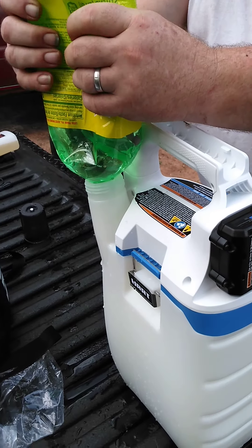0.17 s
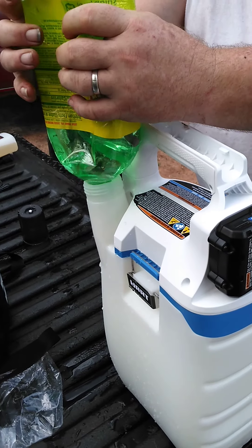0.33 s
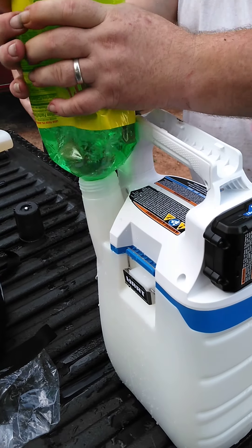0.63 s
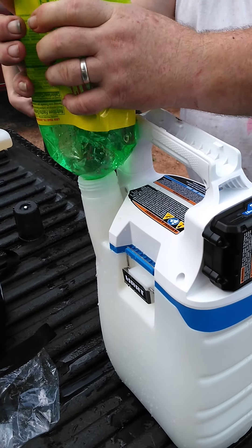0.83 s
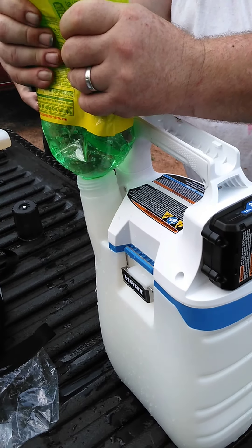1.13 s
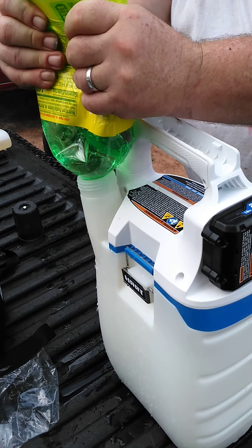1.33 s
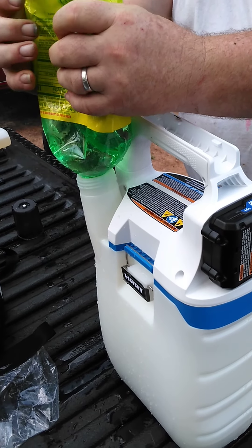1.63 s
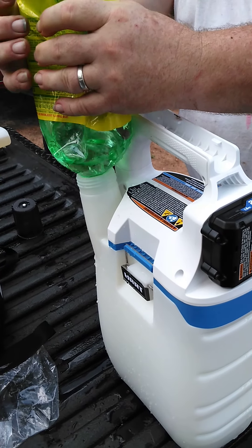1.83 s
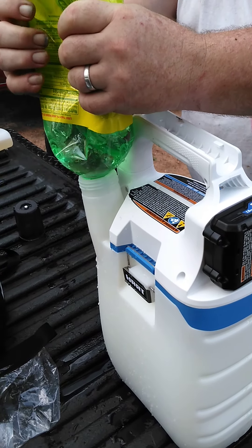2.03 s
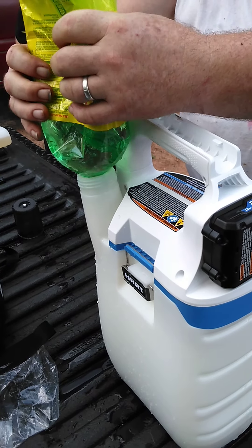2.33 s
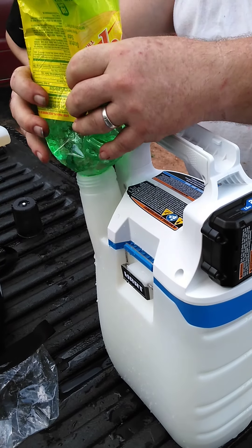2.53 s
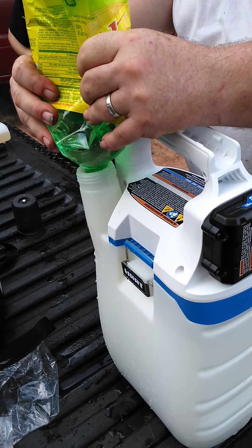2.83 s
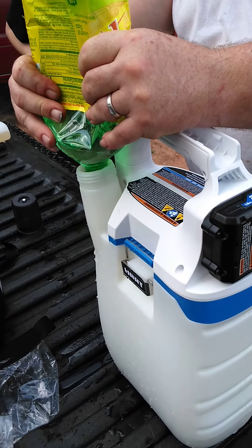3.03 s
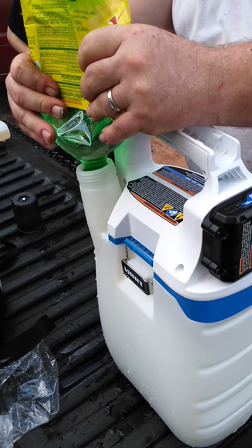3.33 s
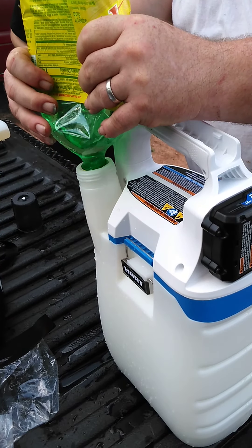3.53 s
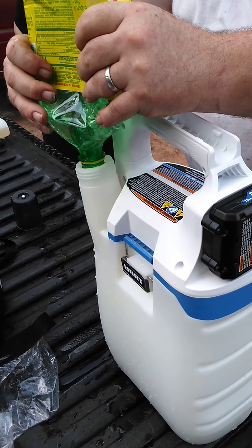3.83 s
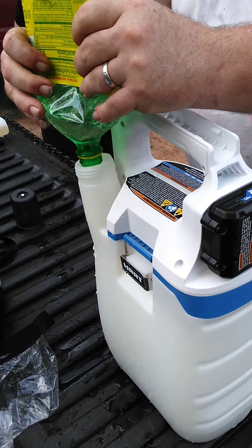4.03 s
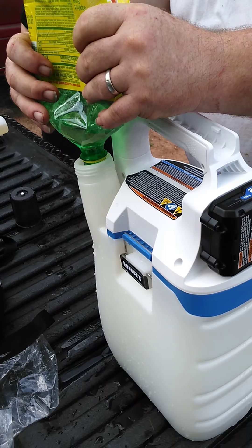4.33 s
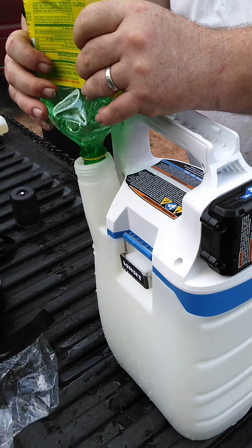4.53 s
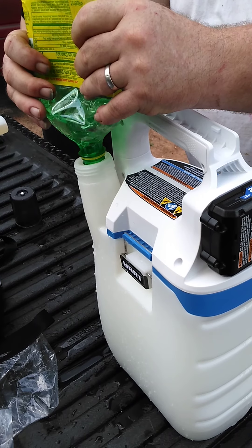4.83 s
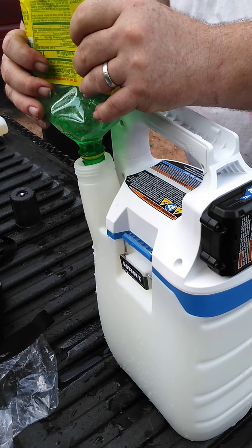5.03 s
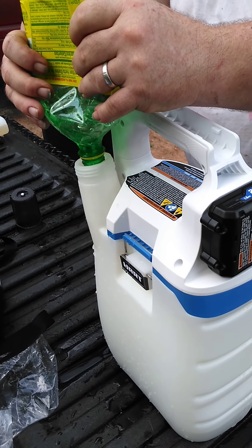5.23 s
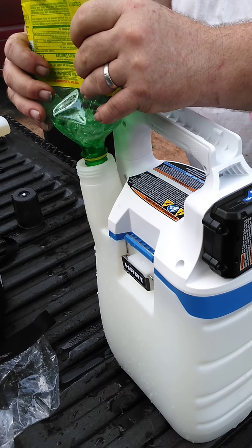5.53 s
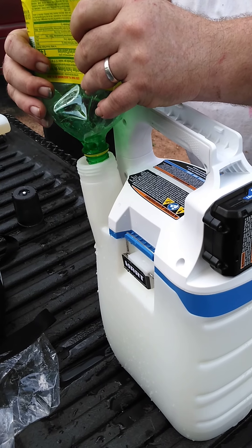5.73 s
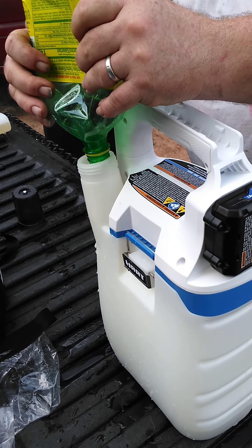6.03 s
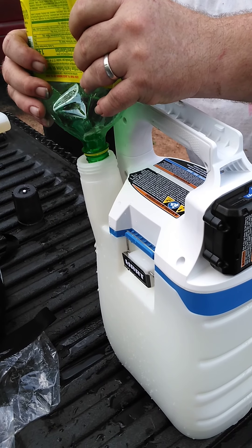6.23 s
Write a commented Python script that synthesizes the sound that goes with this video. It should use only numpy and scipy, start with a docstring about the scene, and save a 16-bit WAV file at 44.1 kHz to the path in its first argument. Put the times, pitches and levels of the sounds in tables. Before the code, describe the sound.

Quiet plops, then sharp buckling plastic cracks and gurgling gushes into a plastic tank, one loud late pop, and sparse watery blips and spatters.

```python
"""Heard first: small plops and splashes; then sharp snaps of thin plastic, gushes of water and a hollow boom;
one more loud snap halfway, then small glugs, plops and splashes. Outdoors on a truck bed, an upturned bottle is
squeezed into the neck of a plastic sprayer tank, later lifted a little. Water is tiny rising bubble tones, ringing
grains and dying sines; plastic is noise bursts and ringing wall modes; hands are micro-slips and narrow-band squeaks.
Two microphones hear the pour a little to the right, with short reflections, a breeze and faint air noise."""
import sys
import numpy as np
from scipy import signal
from scipy.fft import rfft, irfft
from scipy.io import wavfile

SR = 44100
rng = np.random.default_rng(int(sys.argv[2]) if len(sys.argv) > 2 else 0)


def waveform_to_disk(signal):
    """Save audio, clipped to [-1, 1], as 16-bit WAV at the path in sys.argv[1]."""
    frames = np.transpose(np.atleast_2d(signal))
    scaled = np.clip(frames, -1, 1) * 32767
    samples = np.round(scaled).astype(np.int16)
    wavfile.write(sys.argv[1], SR, samples)


N = 281358
TIME = np.arange(N) / SR

# gushes fall into the tank: t/s, length/s, churn level/dB, gurgle over churn/dB
GUSHES = [(0.0, 0.08, -65, -5), (0.034, 0.1, -57, -1), (0.436, 0.088, -54.5, -6), (0.581, 0.034, -54, -36),
          (0.67, 0.043, -38, -0.5), (0.972, 0.088, -35.5, -6), (1.109, 0.041, -49, 9.5),
          (1.233, 0.1, -59.5, 11.5), (1.273, 0.11, -44, -2.5), (1.412, 0.027, -36.5, -2),
          (1.513, 0.019, -34.5, -3), (1.617, 0.048, -44.5, 2), (2.075, 0.014, -57.5, -1.5),
          (2.22, 0.015, -61.5, 8.5), (2.33, 0.071, -63, -13), (2.58, 0.043, -58, -12),
          (2.611, 0.14, -69.5, 9.5), (2.77, 0.14, -60, 1), (2.93, 0.26, -65.5, -3), (3.108, 0.013, -49, 3),
          (3.279, 0.034, -63, 5), (3.579, 0.011, -59.5, 1.5), (3.847, 0.037, -63, 2),
          (4.052, 0.12, -63.5, -0.5), (4.365, 0.016, -60, -1), (4.496, 0.042, -63, -2),
          (4.807, 0.092, -63, 0.5), (5.171, 0.044, -50.5, -10.5), (5.39, 0.022, -54, -9.5),
          (5.54, 0.15, -54.5, -9), (5.867, 0.058, -61, 1), (6.1, 0.036, -68, 4), (6.241, 0.086, -56, -16)]
# a gush sets in fast, holds and drains away; between gushes a thin stream keeps running
GUSH_ATTACK_S, CHURN_FALL_DB_PER_S, GURGLE_FALL_DB_PER_S = 0.01, 199.5, 257
THIN_CHURN_DB, THIN_GURGLE_DB = -73.5, -77.5
# spectral outlines of the falling water: f/Hz, level/dB
CHURN_COLOUR = [(50, -38), (110, -16), (200, 5.5), (420, -8), (620, -9), (1200, -10)]
GURGLE_COLOUR = [(300, -24.5), (550, -7.5), (820, 4), (1100, -1.5), (1800, -8), (4000, -49)]

# the bottle wall buckles: t/s, level/dB, brightest f/Hz, length/s, build-up/s
SNAPS = [(0.6809,-23,2000,0.0053,0.00031), (0.683,-26.5,1150,0.024,0.0012),
         (0.697,-20.5,4080,0.0019,0.00072), (0.9795,-27,1380,0.0078,0.00059),
         (1.0137,-10.5,3900,0.0028,0.00037), (1.018,-16,1280,0.008,0.0022), (1.039,-10,5440,0.004,0.0021),
         (1.053,-25,1230,0.0078,0.00051), (1.194,-28,1540,0.0031,0.00084),
         (1.3497,-14.5,2270,0.0035,0.00029), (1.426,-24,740,0.0018,.002), (1.4317,-11.5,1200,0.007,0.0043),
         (1.5115,-13,3100,0.0038,0.00026), (1.55,-29,1100,0.0045,0.0003), (1.633,-20.5,1090,0.0072,0.0012),
         (3.1007,-7,3970,0.0018,0.00023), (3.11,-31,1084,0.01,0.0024), (3.524,-33,2500,0.00093,0.00084)]
# spectral outline of a snap: f/Hz, level/dB
SNAP_COLOUR = [(100, -14.5), (300, -29), (480, 5.5), (1100, 5.5), (2200, 1.5), (3300, 0.5), (4900, 1.5),
               (6200, -14.5), (8500, -22), (12000, -47.5), (16000, -46.5)]
# a dent pops through with a hollow knock: t/s, level/dB, f/Hz
DENTS = [(1.3502, -15, 449), (1.4345, -23.5, 580), (1.514, -21.5, 890), (1.5465, -21, 429),
         (1.6373, -22.5, 578), (3.1009, -14, 529)]
# the knock is over in a few cycles; the bottle rings on faintly
KNOCK_CYCLES, KNOCK_RING_DB, KNOCK_RING_T60_S = 3.3, -10, .045
# creases crackle between the snaps: t/s, level/dB, brightest f/Hz, length/s
CREASES = [(0.717, -29, 4430, 0.0077), (0.811, -44.5, 4270, 0.0074), (1.057, -25.5, 3980, 0.00086),
           (1.095, -28.5, 3920, .004), (1.117, -29, 4300, 0.0018), (1.173, -32, 4630, 0.0007),
           (1.187, -25.5, 4560, .004), (1.1964, -30.5, 4850, 0.006), (1.212, -23.5, 4530, 0.0011),
           (1.225, -29, 4530, 0.0045), (1.245, -32, 4770, 0.0042), (1.2724, -26, 4630, 0.0039),
           (1.286, -28.5, 4770, 0.0064), (1.393, -27, 4600, 0.0045), (1.409, -23, 4600, 0.0037),
           (1.456, -38, 2600, 0.0021), (1.461, -31, 2300, 0.0027), (1.512, -12, 7740, 0.0026),
           (1.534, -36, 3320, 0.0037), (1.586, -41, 4900, .003), (1.692, -37, 3250, 0.0033),
           (1.792, -33.5, 4060, 0.0016), (2.2402, -34, 4140, 0.0062), (2.312, -34.5, 3000, 0.0035),
           (2.6427, -32.5, 2700, 0.0037), (2.788, -34, 3170, 0.0027), (2.794, -31, 4470, 0.0038),
           (2.889, -36, 3840, 0.004), (2.9, -30, 3000, 0.0051), (2.944, -25, 4850, 0.0024),
           (2.988, -28.5, 4800, 0.0023), (3.032, -35, 3100, .005), (3.145, -30.5, 4780, 0.0051),
           (3.156, -31, 3420, 0.0044), (3.177, -36, 2600, 0.0014), (3.243, -34.5, 6100, 0.0086),
           (3.352, -41.5, 4200, 0.0052)]
# spectral outline of the creases: f/Hz, level/dB
CREASE_COLOUR = [(300, -5.5), (1500, -1.0), (5300, 0.5), (7000, -8.5), (12000, -21.0), (16000, -18.0)]
# modes of the bottle wall, ringing after every snap and crease: f/Hz, level/dB, t60/s
WALL = [(1050, -1.5, .035), (1690, -8, 0.02), (2413, -6, 0.012), (3054, 0.5, .016), (3830, -3, 0.0066),
        (4300, -2.5, .025), (4823, 7.5, 0.013)]
WALL_LOSS_DB_PER_OCTAVE, SNAP_RING_DB, CREASE_RING_DB = 8, -10, -9.5

# slugs of water shake the air in the tank: t/s, level/dB, f/Hz
GLUGS = [(0.004, -48.5, 186), (0.576, -47, 168), (0.675, -45, 218), (0.696, -29, 198), (0.727, -33, 260),
         (0.979, -25.5, 236), (0.997, -26, 203), (1.037, -20.5, 159), (1.055, -38.5, 156),
         (1.303, -40, 312), (1.431, -33.5, 170), (1.53, -44, 262), (1.63, -33.5, 275), (1.874, -50, 119),
         (4.167, -48, 243), (4.497, -42.5, 220), (4.514, -41, 183), (4.564, -47, 165), (4.632, -48.5, 171),
         (4.976, -52.5, 165), (5.191, -39, 227), (5.205, -39.5, 208), (5.251, -40.5, 230),
         (5.553, -44.5, 227), (5.631, -46, 240), (5.784, -58, 236)]
# air and wall resonances of the tank: f/Hz, level/dB, t60/s
TANK = [(126, -12, 0.08), (194.7, -12.5, 0.28), (230.7, -1, 0.094), (330, -10.5, 0.11), (378.6, -18, 0.064)]
# the larger air pockets and bubbles ring: t/s, level/dB, f/Hz
BUBBLES = [(0.051, -40, 726), (0.063, -32, 715), (0.084, -41, 426), (0.089, -31.5, 833), (0.117, -43, 383),
           (0.146, -45, 960), (0.188, -54.5, 850), (0.452, -37.5, 398), (0.473, -43, 387),
           (0.517, -48, 416), (0.981, -27, 520), (1.164, -37.5, 520), (1.195, -39, 423), (1.432, -24, 765),
           (1.677, -30.5, 404), (1.809, -42, 493), (1.919, -43.5, 776), (2.088, -32.5, 425),
           (2.176, -47, 910), (2.223, -38.5, 652), (2.256, -47, 695), (2.36, -50.5, 352), (2.417, -48, 495),
           (2.427, -51, 500), (2.559, -36.5, 463), (2.568, -49, 630), (2.70, -50.5, 440), (2.8, -43.5, 705),
           (2.854, -59, 770), (3.101, -25.5, 1010), (3.232, -41.5, 1260), (3.291, -44.5, 773),
           (3.752, -58.5, 582), (3.86, -43.5, 612), (3.885, -54, 623), (4.116, -41.5, 1000),
           (4.135, -50, 700), (4.37, -56, 595), (4.39, -49.5, 827), (4.445, -52.5, 710),
           (4.484, -41.5, 783), (4.978, -55.5, 770), (5.176, -39.5, 770), (5.184, -40.5, 768),
           (5.263, -41.5, 860), (5.393, -44, 780), (5.408, -50.5, 390), (5.438, -45.5, 890),
           (5.554, -53, 490), (5.597, -44, 870), (5.629, -48, 500), (5.66, -52.5, 490), (5.858, -45.5, 790),
           (5.897, -65, 830), (6.112, -57.5, 606), (6.231, -49, 382), (6.287, -45, 456),
           (6.304, -46.5, 790), (6.354, -45, 757)]
# ring time of a bubble at 1 kHz and how it grows with pitch; smaller bubbles break off with a stronger tick
BUBBLE_T60_S, BUBBLE_T60_POWER = .04, .2
TICK_DB, TICK_DB_PER_OCTAVE = -16, 11
# a bubble sheds a few more: their level, spread of pitch and longest delay
SHED_DB, SHED_OCTAVES, SHED_DELAY_S = -10, 0.37, 0.018
# air squirts through the water in the neck: t/s, length/s, level/dB, f/Hz
SQUIRTS = [(0.447, 0.0089, -56.5, 990), (0.595, 0.013, -55, 1700), (0.907, 0.012, -57.5, 1460),
           (1.81, 0.008, -55, 990), (1.811, 0.008, -58, 1610), (2.088, 0.012, -53, 1360),
           (2.193, 0.013, -63.5, 2580), (2.223, 0.019, -56, 680), (2.228, 0.01, -51, 890),
           (2.232, 0.01, -55, 1740), (2.557, 0.027, -48, 612), (2.4, 0.026, -62.5, 1854),
           (2.777, 0.008, -50, 1560), (3.291, 0.013, -47, 1350), (3.296, 0.031, -53, 2080),
           (3.523, 0.0075, -50, 1373), (3.6, 0.014, -56, 1690), (3.815, 0.0081, -52, 2030),
           (3.832, 0.008, -60.5, 2390), (3.881, 0.0084, -54, 1380), (3.955, 0.011, -51, 2370),
           (4.057, 0.0036, -42, 1713), (4.063, 0.012, -63, 1680), (4.189, 0.014, -55, 1320),
           (4.216, 0.0093, -61, 2780), (4.265, 0.0079, -55.5, 2570), (4.44, 0.021, -53.5, 1710),
           (4.441, 0.0067, -56.5, 2480), (4.483, 0.02, -58.5, 1846), (4.485, 0.0097, -56.5, 2960),
           (4.819, 0.014, -57, 2570), (4.968, 0.0117, -61, 1495), (5.118, 0.01, -68, 1850),
           (5.178, 0.022, -55.5, 1654), (5.24, 0.026, -48, 939), (5.255, 0.022, -63, 2370),
           (5.391, 0.0044, -57, 1250), (5.448, 0.021, -57, 2094), (5.627, 0.01, -51.5, 1110),
           (5.823, 0.025, -61, 1770), (5.841, 0.008, -50, 2610), (5.858, 0.01, -53, 1810),
           (5.892, 0.011, -52.5, 1576), (6.128, 0.011, -65, 1595), (6.162, 0.021, -59.5, 2714),
           (6.267, 0.046, -58.5, 1025), (6.303, .009, -58.5, 1890)]
SQUIRT_WIDTH_SHARE, SQUIRT_RISE_SHARE = .3, .08
# each squirt holds one clean blip: level over the table's, ring time in cycles, climb in pitch
BLIP_DB, BLIP_CYCLES, BLIP_RISE_SHARE = 6.5, 19, 0.081

# hands squeeze and shift the wet bottle:
# t/s, length/s, rustle level/dB, rub over rustle/dB, fine crinkle over rustle/dB
SQUEEZES = [(-0.03, 0.23, -62, 1.5, -18.5), (0.589, 0.048, -59, -12, -16), (0.658, 0.082, -53, -27, -9),
            (0.785, 0.037, -56, -9.5, -29), (0.925, 0.075, -47.5, -5, -13), (0.979, 0.16, -55.5, -2, -4.5),
            (1.12, 0.43, -47.5, -2, -16), (1.596, 0.063, -55, 0, -11), (1.718, 0.54, -73, -2.5, -17),
            (2.208, 0.076, -63.5, -22, -36), (2.375, 0.012, -72, -1, -19), (2.62, 0.069, -62, -8, -6),
            (2.755, 0.048, -57.5, -10.5, -10), (2.827, 0.34, -52, -3, -5.5), (3.25, 0.04, -64, 2.5, 9.5)]
# the fingers tighten over a share of the squeeze, hold and let go; merely holding the bottle rustles faintly
SQUEEZE_BUILD_SHARE, SQUEEZE_FALL_DB_PER_S = 0.38, 165.5
HOLDING_DB, HOLDING_CRINKLE_DB, HOLDING_SWING_DB = -83, -87, 6
# small creases tick along with the rustle; water sloshes along with the rub
CREASES_OVER_RUSTLE_DB, SLOSH_OVER_RUB_DB = -3.5, -2.5
# spectral outlines of rub (and spilled trickle), rustle and crinkle: f/Hz, level/dB
RUB_COLOUR = [(700, -15), (1200, -7.5), (1750, -3.5), (2500, -1.5), (3300, 4.5), (6000, -56.5)]
RUSTLE_COLOUR = [(1800, -32.5), (2700, -12.5), (3500, -6), (4900, -3.5), (5700, -5), (6500, -14.5),
                 (8000, -21), (12000, -46)]
CRINKLE_COLOUR = [(4500, -17.5), (7000, -4.5), (8200, -12.5), (10500, -15), (12000, -25.5), (15500, -37)]
# wet fingers judder on the wall and set it squeaking: t/s, length/s, level/dB, f/Hz
SQUEAKS = [(1.1, 0.03, -47.5, 1710), (1.317, 0.021, -54, 1690), (1.568, .015, -53, 1700),
           (2.867, 0.043, -52, 803), (2.895, 0.021, -43.5, 1726), (2.941, 0.096, -50, 1788),
           (3.083, 0.028, -44.5, 1495), (3.134, 0.028, -52, 1495)]
SQUEAK_WIDTH_HZ, SQUEAK_SAG_SHARE = 225, 0.043

# the lifted bottle spills in spurts: t/s, length/s, fizz level/dB, fine spray over fizz/dB
SPURTS = [(3.53, 0.0047, -64.5, -15), (3.6, 0.01, -67.5, 1), (3.855, 0.014, -62.5, -9.5),
          (4.043, 0.0085, -62, -10), (4.132, 0.11, -64, -1.5), (4.26, 0.13, -72, 2),
          (4.474, 0.0059, -59, -3.5), (4.737, 0.11, -75.5, 7), (4.802, 0.085, -60, -9),
          (4.966, 0.007, -66, 5), (5.042, 0.029, -63.5, -8), (5.159, 0.084, -65, -8),
          (5.382, 0.098, -77, 4), (5.526, 0.06, -64, 3), (5.71, 0.073, -70, 6), (5.848, 0.034, -55, -18),
          (5.938, 0.011, -69, -7), (6.14, 0.0092, -68, -21), (6.215, 0.034, -69.5, -2)]
# a spurt bursts out and its droplets thin away; larger drops trickle along with the fizz
SPURT_ATTACK_S, SPURT_FALL_DB_PER_S, TRICKLE_OVER_FIZZ_DB = 0.0045, 198, -4.5
# spectral outlines of spilled fizz and fine spray: f/Hz, level/dB
SPILL_COLOUR = [(2200, -10.5), (3200, -1), (5300, 2.5), (6700, -6), (7800, -11), (12000, -47.5)]
SPRAY_COLOUR = [(4500, -37), (7000, 3), (8200, -1.5), (10500, -3), (12500, -15.5), (15500, -15)]
# the larger drops spatter on the plastic: t/s, level/dB, brightest f/Hz
SPLASHES = [(0.284, -37, 3440), (0.293, -36, 3600), (0.309, -47, 5100), (0.508, -41.5, 4500),
            (3.5232, -42.5, 3950), (3.6044, -35.5, 6070), (3.753, -48, 5430), (3.873, -40, 2900),
            (4.151, -28, 5700), (4.167, -30, 3720), (4.192, -29, 6100), (4.377, -32.5, 5900),
            (4.483, -36, 2730), (4.644, -52, 6500), (4.715, -48, 4500), (4.792, -39, 7740),
            (4.825, -45, 2590), (4.89, -40.5, 5270), (4.973, -35, 6060), (5.0533, -36.5, 6070),
            (5.183, -29.5, 4500), (5.395, -38, 4340), (5.437, -31.5, 5900), (5.453, -28, 5160),
            (5.538, -33, 5770), (5.712, -35.5, 6700), (5.773, -27, 5600), (5.873, -49, 4670),
            (5.897, -31.5, 8550), (5.943, -41.5, 3850)]
# spectral outline of the spatter: f/Hz, level/dB
SPLASH_COLOUR = [(300, 0.0), (1500, -17), (5500, -3.0), (8000, -8.0), (12000, -12.5), (16000, -17)]
DRIPS_DB = -77

# resonances of the filler neck and bottle: f/Hz, width/Hz, lift/dB
NECK = [(439, 94, 7), (780, 200, 6), (1618, 350, 4.5), (3070, 350, -1), (4430, 260, -2), (5030, 880, 3)]
# spectral outline of the reflections off bed and tank: f/Hz, level/dB
SCATTER = [(100, -22.5), (300, 1.5), (700, -4.5), (1500, 7.5), (8000, 3)]
# left minus right at the microphones: f/Hz, level/dB
BALANCE_DB = [(60, -6.5), (200, 2.5), (380, -1), (700, -5), (1290, 3), (2380, 1.5), (4400, -5.5), (8100, 0),
              (15000, -6.5)]
# drops and cracks come from spots of their own: lag at the left microphone, level spread on each side
LEFT_LAG_S, LAG_SPREAD_S, PAN_SPREAD_DB = .00034, .00014, 0.3
# puffs of air on the microphones, over a faint breeze: t/s, length/s, level/dB
PUFFS = [(0.672, 0.05, -46.5), (1.006, 0.08, -54), (1.42, 0.05, -62.5), (1.842, 0.027, -51.5),
         (2.24, 0.14, -59.5), (2.546, 0.72, -59.5), (4.92, 0.098, -56.5)]
PUFF_ATTACK_S, PUFF_FALL_DB_PER_S, BREEZE_DB, BREEZE_SWING_DB = 0.058, 114.5, -67.5, 4
# spectral outlines of breeze and steady air noise: f/Hz, level/dB
BREEZE_COLOUR = [(18, -25.5), (35, -25), (55, 9), (80, 0.5), (110, 2), (160, -8), (300, -29.5), (800, -62)]
AIR_COLOUR = [(30, -23), (120, 7), (200, -3.5), (500, -16), (1500, -33), (4500, -10), (8000, -29),
              (11000, -24), (13000, -74)]
AIR_DB, CUTOFF_HZ = -71, 15600


def stream():
    """The falling water churns and gurgles in the tank: low ringing grains and rising bubble tones."""
    s, length, db, gurgle_over_db = np.transpose(GUSHES)
    churn_db = swells(s, length, db, GUSH_ATTACK_S, CHURN_FALL_DB_PER_S, THIN_CHURN_DB)
    gurgle_db = swells(s, length, db + gurgle_over_db, GUSH_ATTACK_S, GURGLE_FALL_DB_PER_S, THIN_GURGLE_DB)
    churn = grains(per_s=400, low_hz=122.8, high_hz=614, cycles=9.8, spread_db=1.0)
    gurgle = plinks(per_s=260, low_hz=460, high_hz=1400, cycles=18, rise=.14, spread_db=2.5)
    return voiced(churn, CHURN_COLOUR, churn_db) + voiced(gurgle, GURGLE_COLOUR, gurgle_db)


def wall_snaps():
    """A dent runs through the thin wall in a few milliseconds and sets its modes ringing."""
    out = np.zeros((2, N))
    for s, db, hz, length, build_up in SNAPS:
        noise = burst(hz, length, build_up, focus_db=8.0, tail_db=-24.5, tail_t60=0.071)
        crack = peak_one(coloured(noise, SNAP_COLOUR))
        ring = from_db(SNAP_RING_DB) * wall_ring(hz, length)
        add(out, s, from_db(db + 1.0) * (crack + ring))
    return out


def dents():
    """The wall flips over and shoves the air in the bottle for a few cycles."""
    out, t = np.zeros((2, N)), TIME[:SR // 4]
    for s, db, hz in DENTS:
        arch = np.sin(np.pi * np.minimum(t * hz / KNOCK_CYCLES, 1))
        shove = np.sin(2 * np.pi * hz * t) * arch
        ring = ping(hz, KNOCK_RING_T60_S, rise=0, swell_cycles=0.79)
        add(out, s, from_db(db) * peak_one(shove + from_db(KNOCK_RING_DB) * ring))
    return out


def crackles():
    """Single creases give way, each a short dry tick."""
    out = np.zeros((2, N))
    for s, db, hz, length in CREASES:
        tick = peak_one(burst(hz, length, build_up=0.00049, focus_db=24, tail_db=-22.5, tail_t60=.06))
        ring = from_db(CREASE_RING_DB) * wall_ring(hz, length)
        add(out, s, from_db(db - 2.5) * (tick + ring))
    return coloured(out, CREASE_COLOUR)


def glugs():
    """Each slug gives a low gulp and leaves the tank's resonances booming."""
    out = np.zeros((2, N))
    for s, db, hz in GLUGS:
        gulp = ping(hz, t60=0.046, rise=0.07, swell_cycles=0.3)
        boom = sum(from_db(level + rng.normal(0, 0.91)) * ping(f, t60, rise=0, swell_cycles=1.0)
                   for f, level, t60 in TANK)
        add(out, s, from_db(db) * (from_db(4.0) * gulp + from_db(-6.5) * boom))
    return out


def bubbles():
    """Air breaks off at the neck with a wet tick, then rings briefly, rising in pitch."""
    out = np.zeros((2, N))
    for s, db, hz in BUBBLES:
        octaves = np.log2(hz / 1000)
        t60 = BUBBLE_T60_S * 2 ** (BUBBLE_T60_POWER * octaves)
        tone = ping(hz, t60, rise=.1, swell_cycles=.65)
        t = TIME[:len(tone)]
        froth = resonance(rng.standard_normal(len(t)), hz, hz * .5)
        froth = froth * from_db(-60 * t / 0.07) * (1 - np.exp(-t / .004))
        tick = resonance(rng.standard_normal(len(t)), hz=1700, width_hz=800) * from_db(-60 * t / .04)
        tick_db = TICK_DB + TICK_DB_PER_OCTAVE * octaves
        plop = tone + from_db(-10) * peak_one(resonance(froth, hz, hz))
        add(out, s, from_db(db - 1.0) * (plop + from_db(tick_db) * peak_one(tick)))
        for delay, pitch in rng.random((3, 2)):
            shed_hz = hz * 2 ** (SHED_OCTAVES * (2 * pitch - 1))
            shed = ping(shed_hz, t60, rise=.1, swell_cycles=.65)
            add(out, s + SHED_DELAY_S * delay, from_db(db + SHED_DB) * shed)
    return out


def squirts():
    """A bubble blips through the neck, rising in pitch, amid a little rising froth."""
    out = np.zeros((2, N))
    for s, length, db, hz in SQUIRTS:
        froth = rasp(hz, SQUIRT_WIDTH_SHARE * hz, length, SQUIRT_RISE_SHARE)
        blip = ping(hz, BLIP_CYCLES / hz, BLIP_RISE_SHARE, swell_cycles=2.0)
        add(out, s, from_db(db - 2.0) * froth)
        add(out, s + .25 * length, from_db(db + BLIP_DB) * blip)
    return out


def grip():
    """Fingers drag on plastic and label: dry micro-slips in fits, ticking creases; water sloshes inside."""
    s, length, db, rub_over_db, crinkle_over_db = np.transpose(SQUEEZES)
    build_s, fall = SQUEEZE_BUILD_SHARE * length, SQUEEZE_FALL_DB_PER_S
    holding_db = HOLDING_DB + HOLDING_SWING_DB * np.tanh(drift(18))
    rub_db = swells(s, length, db + rub_over_db, build_s, fall, holding_db)
    rustle_db = swells(s, length, db, build_s, fall, holding_db)
    crinkle_db = swells(s, length, db + crinkle_over_db, build_s, fall, HOLDING_CRINKLE_DB)
    rub = grains(per_s=2400, low_hz=950, high_hz=2700, cycles=15, spread_db=3.6)
    rustle = grains(per_s=2600, low_hz=2600, high_hz=6500, cycles=22, spread_db=4.3)
    crinkle = grains(per_s=840, low_hz=6500, high_hz=15000, cycles=34, spread_db=2)
    slosh = plinks(per_s=230, low_hz=620, high_hz=2400, cycles=19, rise=.1, spread_db=3)
    creases = grains(per_s=110, low_hz=2400, high_hz=5500, cycles=5, spread_db=3)
    slips = voiced(rub, RUB_COLOUR, rub_db) + voiced(rustle, RUSTLE_COLOUR, rustle_db)
    slips = slips + voiced(crinkle, CRINKLE_COLOUR, crinkle_db)
    fits = from_db(3.6 * drift(70) - 2.0)
    ticks = from_db(rustle_db + CREASES_OVER_RUSTLE_DB) * rms_one(through_wall(creases))
    return fits * slips + ticks + from_db(rub_db + SLOSH_OVER_RUB_DB) * rms_one(slosh)


def squeaks():
    """The rubbed wall rings in a narrow band whose pitch sags a little."""
    out = np.zeros((2, N))
    for s, length, db, hz in SQUEAKS:
        add(out, s, from_db(db) * rasp(hz, SQUEAK_WIDTH_HZ, length, -SQUEAK_SAG_SHARE))
    return out


def spill():
    """Loose water breaks into droplets and small bubbles, in fluttering spurts."""
    s, length, db, spray_over_db = np.transpose(SPURTS)
    fizz_db = swells(s, length, db, SPURT_ATTACK_S, SPURT_FALL_DB_PER_S, rest_db=-82)
    spray_db = swells(s, length, db + spray_over_db, SPURT_ATTACK_S, SPURT_FALL_DB_PER_S, rest_db=-115)
    trickle = plinks(per_s=420, low_hz=900, high_hz=3400, cycles=21, rise=.12, spread_db=2.8)
    fizz = grains(per_s=1400, low_hz=3100, high_hz=7200, cycles=40, spread_db=3.8)
    spray = grains(per_s=900, low_hz=6470, high_hz=15000, cycles=30, spread_db=4.5)
    drops = voiced(trickle, RUB_COLOUR, fizz_db + TRICKLE_OVER_FIZZ_DB)
    drops = drops + voiced(fizz, SPILL_COLOUR, fizz_db) + voiced(spray, SPRAY_COLOUR, spray_db)
    return from_db(4.5 * drift(80)) * drops


def splashes():
    """Larger drops hit the plastic: short bright bursts of noise."""
    out = np.zeros((2, N))
    for s, db, hz in SPLASHES:
        spatter = burst(hz, length=0.003, build_up=0.001, focus_db=21, tail_db=-25, tail_t60=.06)
        add(out, s, from_db(db + 1.5) * peak_one(spatter))
    return coloured(out, SPLASH_COLOUR)


def drips():
    """Faint single drops inside the tank, each a rising bubble tone."""
    drops = plinks(per_s=22, low_hz=600, high_hz=4500, cycles=30, rise=.12, spread_db=3)
    return from_db(DRIPS_DB) * rms_one(drops)


def truck_bed(x, t60):
    """A short scatter of reflections from the ribbed bed and the tank, as decaying noise."""
    t = TIME[:SR // 3]
    decay = from_db(-60 * t / t60) + from_db(-17.5 - 60 * t / 0.1)
    echoes = rng.standard_normal(len(t)) * decay * (t > .0008)
    echoes = echoes / np.sqrt(np.sum(echoes ** 2))
    return coloured(signal.oaconvolve(x, echoes)[:N], SCATTER)


def light_breeze():
    """Puffs of air brush the microphones as low noise over a wavering breeze."""
    level_db = swells(*np.transpose(PUFFS), PUFF_ATTACK_S, PUFF_FALL_DB_PER_S, BREEZE_DB)
    level_db = level_db + BREEZE_SWING_DB * np.tanh(drift(8.5))
    sides_db = np.array([[-1.5], [1.2]])
    return from_db(level_db + sides_db) * outdoors(BREEZE_COLOUR, own_db=-11.0)


def outdoors(colour, own_db):
    """Background noise, partly shared by the two microphones."""
    shared, own_left, own_right = [rms_one(coloured(w, colour)) for w in rng.standard_normal((3, N))]
    return rms_one(shared + from_db(own_db) * np.array([own_left, own_right]))


def through_neck(x):
    """The water is heard through the resonances of the hollow neck and bottle."""
    return x + sum((from_db(db) - 1) * resonance(x, hz, width) for hz, width, db in NECK)


def voiced(x, colour, level_db):
    """Colour a texture, pass it through the neck and set its level."""
    return from_db(level_db) * rms_one(through_neck(coloured(x, colour)))


def wall_ring(hz, length):
    """The wall's modes, set off one by one while a fold runs; those near hz ring most."""
    ring, t = np.zeros(SR // 5), TIME[:SR // 25]
    for (f, db, t60), delay in zip(WALL, rng.random(len(WALL))):
        at = int(delay * abs(length) * SR / 2)
        level_db = db - WALL_LOSS_DB_PER_OCTAVE * abs(np.log2(f / hz))
        ring[at:at + len(t)] += np.sin(2 * np.pi * f * t) * from_db(level_db - 60 * t / t60)
    return peak_one(ring)


def through_wall(x):
    """Small clicks set the wall's modes ringing."""
    # a decay of 60 dB in t60 fixes the bandwidth
    return sum(from_db(db) * resonance(x, hz, np.log(1000) / np.pi / t60) for hz, db, t60 in WALL)


def grains(per_s, low_hz, high_hz, cycles, spread_db):
    """Countless tiny ringing events of uneven size, pitch and place."""
    pitches, out = np.geomspace(low_hz, high_hz, num=10), np.zeros((2, N))
    for hz in pitches:
        lag, left, right = spots(count=3000)
        when, size, sign, chance = rng.random((4, len(lag)))
        born = chance < per_s * N / SR / len(pitches) / len(lag)
        height = born * np.sign(sign - .5) * from_db(spread_db * np.minimum(-np.log(size), 4))
        at = (when * N).astype(int)
        left_clicks = np.bincount(at + lag, height * left, N)[:N]
        right_clicks = np.bincount(at, height * right, N)
        out += resonance(np.array([left_clicks, right_clicks]), hz, 2 * hz / cycles)
    return out


def plinks(per_s, low_hz, high_hz, cycles, rise, spread_db):
    """Separate small bubbles at random times and pitches; each rings some cycles, climbing by the share rise."""
    out, turns = np.zeros((2, N + SR)), np.linspace(0, cycles, num=600)
    wave = np.sin(2 * np.pi * turns * (1 + rise * turns / cycles / 2))
    shape = wave * (1 - np.exp(-turns)) ** 2 * from_db(-60 * turns / cycles)
    lags = spots(count=3000)[0]
    chance, when, pitch, size = rng.random((len(lags), 4)).T
    hzs = low_hz * (high_hz / low_hz) ** pitch
    heights = from_db(spread_db * np.minimum(-np.log(size), 3))
    for k in np.flatnonzero(chance < per_s * N / SR / len(lags)):
        tone = heights[k] * np.interp(np.arange(0, cycles, hzs[k] / SR), turns, shape)
        at = int(when[k] * N)
        out[0, at + lags[k]:at + lags[k] + len(tone)] += tone
        out[1, at:at + len(tone)] += tone
    return out[:, :N]


def burst(hz, length, build_up, focus_db, tail_db, tail_t60):
    """A rush of noise, strongest around hz, and the brief ring of the plastic as a fading tail."""
    t = TIME[:SR // 5]
    noise = rng.standard_normal(len(t))
    noise = rms_one(noise + from_db(focus_db) * resonance(noise, hz, hz / 3))
    onset = 1 - np.exp(-t / max(build_up, 1e-4))
    return noise * onset * (np.exp(-(t / length) ** 2) + from_db(tail_db - 60 * t / tail_t60))


def rasp(hz, width_hz, length, glide):
    """A rough band of noise that swells and fades; its pitch moves by the share glide within length."""
    t = TIME[:SR // 4]
    lowpass = signal.butter(2, np.clip(width_hz / 2, 10, 3000), fs=SR, output="sos")
    # the first half is dropped so the filter has settled
    real, imaginary = signal.sosfilt(lowpass, rng.standard_normal((2, 2 * len(t))))[:, len(t):]
    phase = 2 * np.pi * hz * (t + glide * t * np.minimum(t / length, 4) / 2)
    swell = np.sqrt(t / length) * np.exp(-2 * (t / length) ** 2)
    swell = swell + .06 * from_db(-60 * t / .09) * np.minimum(t / length, 1)
    sound = (real * np.cos(phase) + imaginary * np.sin(phase)) * swell
    return sound / np.sqrt(np.sum(sound ** 2) / (length * SR))


def ping(hz, t60, rise, swell_cycles):
    """A dying sine that swells over its first cycles; its pitch climbs by the share rise within t60."""
    t = TIME[:SR // 4]
    phase = 2 * np.pi * hz * (t + rise * t * t / (2 * t60))
    swell = (1 - np.exp(-t * hz / swell_cycles)) ** 2
    return peak_one(np.sin(phase) * from_db(-60 * t / t60) * swell)


def swells(starts, lengths, levels_db, attack_s, fall_db_per_s, rest_db):
    """Level in dB of overlapping swells: each rises, holds until its length is over, then dies to rest."""
    t = TIME[::16]
    power = 0
    for s, length, db, attack in np.broadcast(starts, lengths, levels_db, attack_s):
        rise = np.clip((t - s) / attack, 0, 1)
        fall_db = fall_db_per_s * np.maximum(t - s - length, 0)
        power = power + (rise * from_db(db - fall_db)) ** 2
    return 10 * np.log10(np.interp(TIME, t, power) + from_db(rest_db) ** 2)


def drift(rate):
    """Slow random wander: unit-spread random points, rate per second, joined by lines."""
    knots = rng.standard_normal(2000)
    return np.interp(TIME * rate, np.arange(len(knots)), knots)


def spots(count):
    """Left lags in samples and left and right gains for scattered sources."""
    lag, pan = rng.standard_normal((count, 2)).T
    lag_s = np.maximum(LEFT_LAG_S + LAG_SPREAD_S * lag, 0)
    return np.round(lag_s * SR).astype(int), from_db(PAN_SPREAD_DB * pan), from_db(-PAN_SPREAD_DB * pan)


def add(out, s, sound):
    """Mix a sound from the bottle neck into both channels at time s; the left hears it later."""
    left_lag = LEFT_LAG_S * np.exp(rng.normal(0, 0.16))
    for channel, lag in zip(out, (left_lag, 0)):
        at = max(round((s + lag) * SR), 0)
        channel[at:at + len(sound)] += sound[:N - at]


def coloured(x, points):
    """Causal (minimum-phase) filter with the given (f/Hz, level/dB) outline."""
    hz, db = np.transpose(points)
    grid = np.maximum(np.fft.rfftfreq(4096, 1 / SR), 1)
    cepstrum = irfft(np.log(from_db(np.interp(np.log(grid), np.log(hz), db))))
    # folding the cepstrum onto positive times makes the filter causal
    fold = np.r_[1, np.full(len(grid) - 2, 2), 1, np.zeros(len(grid) - 2)]
    response = np.array(irfft(np.exp(rfft(cepstrum * fold))), ndmin=x.ndim)
    return signal.oaconvolve(x, response, axes=-1)[..., :x.shape[-1]]


def resonance(x, hz, width_hz):
    """Two-pole band-pass with gain near 1 on top."""
    r = np.exp(-np.pi * abs(width_hz) / SR)
    zeros = np.array([1, 0, -1]) * (1 - r * r) / 2
    poles = [1, -2 * r * np.cos(2 * np.pi * hz / SR), r * r]
    return signal.lfilter(zeros, poles, x + 1e-18)


def from_db(db):
    """Decibels to gain."""
    return 10 ** (np.asarray(db) / 20)


def rms_one(x):
    """Scale to unit power."""
    return x / np.sqrt(np.mean(x ** 2) + 1e-20)


def peak_one(x):
    """Scale to unit height."""
    return x / np.max(np.abs(x))


def scene():
    """The pour stands a little to the right; a light breeze brushes the microphones."""
    fine = stream() + spill() + drips() + splashes() + grip() + crackles()
    hits = wall_snaps() + dents() + squeaks() + glugs() + bubbles() + squirts()
    scattered = from_db(-3.5) * fine + from_db(-7.5) * hits
    reflections = np.array([truck_bed(side, t60=0.0091) for side in scattered])
    left, right = from_db(-1) * fine + hits + reflections
    # each side takes half of the balance
    left = coloured(left, [(hz, db / 2) for hz, db in BALANCE_DB])
    right = coloured(right, [(hz, -db / 2) for hz, db in BALANCE_DB])
    air = from_db(AIR_DB) * outdoors(AIR_COLOUR, own_db=-7.5)
    return np.array([left, right]) + light_breeze() + air


def record(dry):
    """The top is cut steeply."""
    steep = signal.ellip(10, .1, 80, CUTOFF_HZ, fs=SR, output="sos")
    return signal.sosfilt(steep, dry)


dry = scene()
out = record(dry)
waveform_to_disk(out)
```